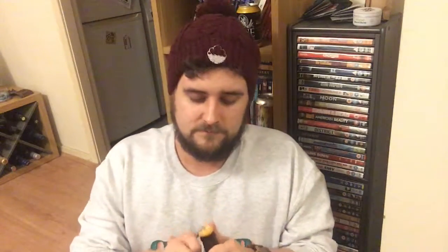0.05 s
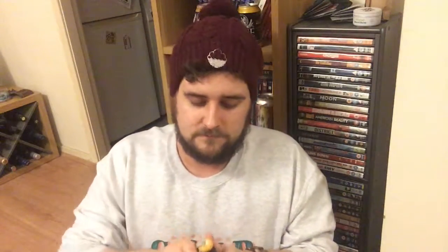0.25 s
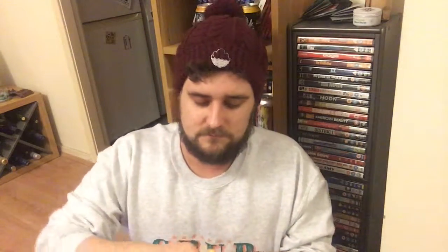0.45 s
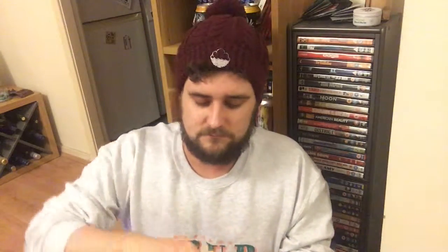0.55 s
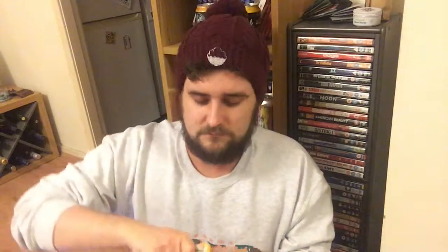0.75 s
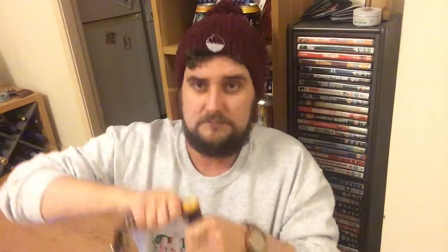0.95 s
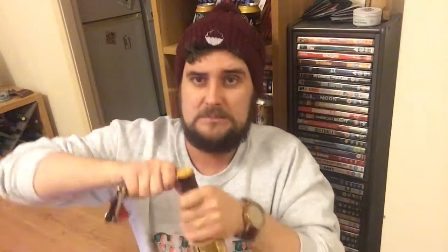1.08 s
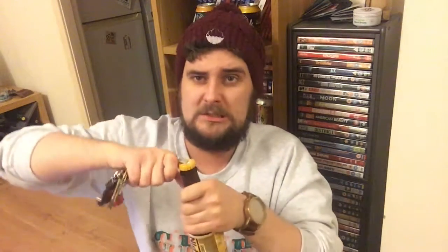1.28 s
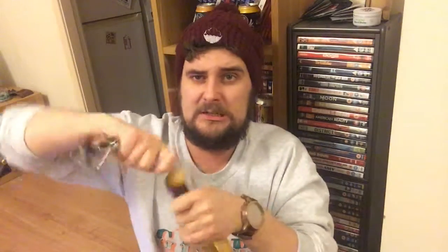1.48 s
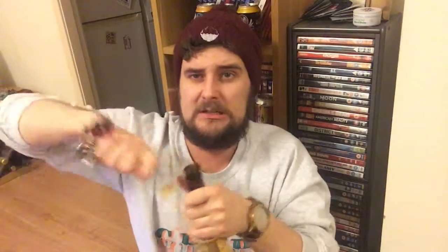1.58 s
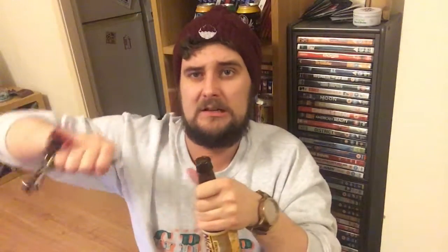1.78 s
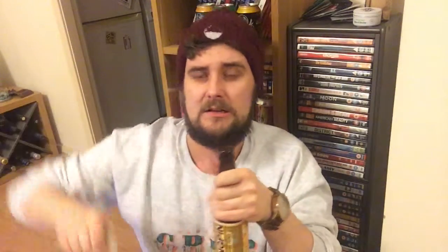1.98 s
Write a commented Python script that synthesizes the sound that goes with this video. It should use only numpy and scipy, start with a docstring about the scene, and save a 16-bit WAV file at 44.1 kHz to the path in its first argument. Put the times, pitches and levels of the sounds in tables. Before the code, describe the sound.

A crown cap is levered off a glass bottle with faint clicks and a sharp pop.

```python
"""Hands bump a glass bottle and a key-ring opener scrapes and clicks onto its crown cap, close to
the microphone in a small room. A little gas hisses past the seal and the crimp gives in dry snaps.
At 1.5 s the cap lifts with a short pop of the bottle neck: gas rushes out, cap and opener ring, and
the keys swing and clash. Mains hum and faint room noise lie underneath."""
import sys
import numpy as np
from scipy import signal
from scipy.fft import rfft, irfft
from scipy.io import wavfile
from scipy.ndimage import uniform_filter1d

SR = 44100
rng = np.random.default_rng(int(sys.argv[2]) if len(sys.argv) > 2 else 0)


def dump(signal):
    """Clip the signal to [-1, 1] and save it as 16-bit WAV at the path in sys.argv[1]."""
    limited = np.clip(np.atleast_2d(signal).T, -1, 1)
    pcm = np.round(limited * 32767).astype(np.int16)
    wavfile.write(sys.argv[1], SR, pcm)


N = 89478


def amp(db):
    """Decibels to gain."""
    return 10 ** (np.asarray(db) / 20)


def unit(x):
    """Scales to rms 1."""
    return x / np.sqrt(np.mean(x ** 2) + 1e-20)


def decay(t, t60):
    """An exponential fall of 60 dB every t60 seconds."""
    return np.exp(-np.log(1000) * t / t60)


def read(points, hz):
    """Reads a table on a log-frequency axis."""
    f, value = np.transpose(points)
    return np.interp(np.log(hz + 1), np.log(f + 1), value)


def add(mix, s, sound):
    """Mixes a sound in at s seconds."""
    part = mix[max(round(s * SR), 0):][:len(sound)]
    part += sound[:len(part)]


def colour(x, spectrum):
    """Gives x a spectrum, at rms 1."""
    return unit(irfft(rfft(x) * amp(read(spectrum, np.fft.rfftfreq(N, 1 / SR))), N))


def crack(band_dbs, t60):
    """A noise burst in six bands; t60 holds at 3 kHz, and the treble dies slightly sooner."""
    # Edges of the six bands: (frequency [Hz])
    edges = [180, 820, 1500, 3300, 5300, 8400, 16000]
    treble_damping, attack_s = 0.032, .0004
    t = np.arange(SR // 16) / SR
    out = np.zeros(len(t))
    for lo, hi, db in zip(edges, edges[1:], band_dbs):
        band_t60 = t60 * (3000 / np.sqrt(lo * hi)) ** treble_damping
        burst = rng.standard_normal(len(t)) * decay(t, band_t60) * (1 - np.exp(-t / attack_s))
        band = signal.sosfilt(signal.butter(2, [lo, hi], "band", fs=SR, output="sos"), burst)
        out += amp(db) * band / np.sqrt(np.sum(band ** 2) / (.005 * SR))  # level: energy over 5 ms
    return out


def ring(hz, db, t60, attack_s=0.00095):
    """One dying mode."""
    t = np.arange(SR // 2) / SR
    return amp(db) * decay(t, t60) * (1 - np.exp(-t / attack_s)) * np.sin(2 * np.pi * hz * t)


def contacts(rows, t60):
    """A series of hard contacts, each a crack of noise."""
    out = np.zeros(N)
    for s, *band_dbs in rows:
        add(out, s, crack(band_dbs, t60))
    return out


def rings(rows, attack_s):
    """A series of knocks, each ringing a single mode."""
    out = np.zeros(N)
    for s, hz, db, t60 in rows:
        add(out, s, ring(hz, db, t60, attack_s))
    return out


def struck(blows, modes):
    """Every blow rings all the given modes."""
    out = np.zeros(N)
    for s, blow_db in blows:
        add(out, s, sum(ring(hz, blow_db + db, t60) for hz, db, t60 in modes))
    return out


def room_tone():
    """The place itself: faint low noise and mains hum."""
    # Room noise: (frequency [Hz], relative level [dB])
    spectrum = [(20, 1), (33, -0.5), (45, 6), (75, 3), (130, -5), (250, -6.5), (500, -11), (1000, -16.5),
                (3500, -20), (8000, -29.5), (16000, -33)]
    hum_hz, hum_db, noise_db = 99.6, -66, -72.5
    hum = amp(hum_db) * np.sin(2 * np.pi * (hum_hz * np.arange(N) / SR + rng.random()))
    return hum + amp(noise_db) * colour(rng.standard_normal(N), spectrum)


def room(x):
    """Dense reflections off the nearby walls, each band dying at its own speed."""
    # Reverberation of the small room: (frequency [Hz], t60 [s])
    decay_times = [(150, 0.42), (1000, 0.33), (3000, 0.36), (6000, 0.33), (10000, 0.25), (16000, 0.23)]
    taps = rng.choice([-1., 1.], SR) * (rng.random(SR) < 1 / 8)
    hz, t, bands = signal.stft(taps, SR, nperseg=256)
    tail = signal.istft(bands * decay(t, read(decay_times, hz)[:, None]), SR, nperseg=256)[1]
    out = np.zeros(N)
    add(out, .004, signal.fftconvolve(x, tail / np.linalg.norm(tail)))  # 4 ms behind the direct sound
    return out


def hands():
    """Opener, keys and glass tick as they are handled, and the hands bump the bottle."""
    # Light contacts: (time [s], level in each of the six bands [dB])
    ticks = [(.019, -60.5, -88, -56, -72, -72, -53), (.055, -62.5, -74, -45.5, -52.5, -64, -85),
             (.219, -78, -89, -56, -49.5, -53.5, -68), (.409, -86, -98, -76, -61, -61.5, -66.5),
             (.431, -84, -93, -70, -60.5, -63, -65), (.752, -77, -82, -64.5, -68, -68, -82),
             (1.088, -69, -66.5, -65.5, -100, -95, -99), (1.099, -69.5, -79, -65.5, -97, -92, -99),
             (1.15, -90, -92, -69.5, -69.5, -94, -87), (1.407, -76, -84, -67.5, -68, -69.5, -77),
             (1.438, -83, -85, -78, -66, -72, -83), (1.9335, -57, -63, -71, -86, -84, -95),
             (1.952, -57, -69, -58, -61, -67, -66.5)]
    # Soft bumps: (time [s], pitch [Hz], level [dB], t60 [s])
    bumps = [(.008, 276.7, -52, 0.14), (.05, 316, -48, 0.055), (1.088, 230, -46.5, 0.035),
             (1.099, 68, -57, 0.14), (1.952, 130, -56, 0.12), (1.96, 63, -61, 0.19)]
    return contacts(ticks, t60=0.013) + rings(bumps, attack_s=0.0064)


def key_rattle():
    """Many tiny contacts among the keys, bunched in clumps and following the movement of the hand."""
    # Stirring of the key bunch: (time [s], level [dB])
    levels = [(0, -59), (0.051, -57), (.12, -88), (.3, -73), (.39, -74), (.425, -69.5), (.48, -74),
              (.55, -80.5), (.79, -80), (1, -85.5), (1.3, -83.5), (1.42, -74), (1.5, -71), (1.62, -58),
              (1.73, -61.5), (1.78, -66), (1.909, -70.5), (2.03, -78.5)]
    # Keys rubbing together: (frequency [Hz], relative level [dB])
    spectrum = [(200, -4.5), (700, -2.5), (1500, 3.5), (2800, 1.5), (4100, 3.5), (6500, -1), (9000, -12.5),
                (16000, -13.5)]
    contacts_per_s, spread_db, clump_db = 6000, 2.5, 3.5
    sizes = amp(spread_db * np.minimum(rng.exponential(1, N), 4))
    grains = sizes * rng.choice([-1, 1], N) * (rng.random(N) < contacts_per_s / SR)
    clumps = amp(clump_db * unit(uniform_filter1d(rng.standard_normal(N), size=256)))
    movement = amp(np.interp(np.arange(N) / SR, *np.transpose(levels)))
    return colour(grains * clumps, spectrum) * movement


def opener_scrape():
    """The opener bites, then slides into place: metal-on-metal friction noise in a few resonances."""
    # Resonances of the scrape: (frequency [Hz], width [Hz], relative level [dB])
    modes = [(2250, 180, -5), (2952, 126, -2.5), (2730, 240, -3), (6400, 140, -18)]
    start_s, length_s, slide_db, bite_gain, bite_s = .055, 0.043, -48, 3, 0.0028
    t = np.arange(0, length_s, 1 / SR)
    friction, sound = rng.standard_normal(SR // 4), np.zeros(len(t))
    for hz, width, db in modes:
        b, a = signal.iirpeak(hz, hz / width, fs=SR)
        resonance = signal.lfilter(b, a, signal.lfilter(b, a, friction))
        sound += amp(db) * unit(resonance[-len(t):])
    bite = 1 + bite_gain * np.exp(-t / bite_s)
    out = np.zeros(N)
    add(out, start_s, amp(slide_db) * unit(sound) * signal.windows.tukey(len(t), .1) * bite)
    return out


def opener_seat():
    """The opener drops onto the cap: a bright click, and the metal rings on."""
    # The landing: (time [s], level [dB])
    blows = [(0.1081, -46)]
    # Opener against cap: (frequency [Hz], relative level [dB], t60 [s])
    modes = [(1106, -7, 0.13), (2370, 0.5, 0.061), (2850, -10.5, 0.12), (5190, -12.5, .15),
             (7219, 1, 0.052), (7860, -4, 0.13), (7950, -9, 0.099)]
    # Contact noise: (frequency [Hz], relative level [dB])
    spectrum = [(200, -24), (800, -17.5), (1300, -3.5), (2300, 3), (4200, -9.5), (6000, 1), (8000, 0),
                (9300, -10.5), (10200, -33), (11500, -2), (14000, -2), (16000, -12)]
    t = np.arange(SR // 16) / SR
    click = amp(-33.5) * colour(rng.standard_normal(N), spectrum)[:len(t)] * decay(t, t60=0.026)
    out = struck(blows, modes)
    add(out, blows[0][0], click)
    return out


def crimp_snaps():
    """The crimp gives way under the lever in short dry snaps."""
    # Snaps: (time [s], level in each of the six bands [dB])
    snaps = [(1.2212, -85, -71.5, -64, -59, -77, -79), (1.2229, -90, -88, -60.5, -61.5, -81, -84),
             (1.2735, -84, -89, -63.5, -62, -67, -83), (1.277, -84, -80, -65.5, -61.5, -66, -84)]
    return contacts(snaps, t60=0.0049)


def metal_clashes():
    """Cap, opener and keys clash after the pop; single pieces clink before and after it."""
    # Collisions: (time [s], level in each of the six bands [dB])
    clashes = [(1.523, -67.5, -57, -57, -51, -73, -55), (1.537, -65.5, -55, -54, -57, -68, -56),
               (1.545, -76, -57, -55, -57, -52, -48), (1.5763, -89, -53.5, -45.5, -50, -47, -66),
               (1.581, -74, -51, -42, -37, -47, -44), (1.589, -75, -51.5, -42.5, -39.5, -38, -40.5),
               (1.5935, -61, -51.5, -43.5, -52, -36, -40.5), (1.5978, -84, -54.5, -68, -52, -45, -40),
               (1.6032, -87, -58, -50, -53, -52, -43), (1.6195, -91, -54, -45.5, -40.5, -54, -54),
               (1.6225, -74, -52.5, -48, -46, -52, -44.5), (1.677, -80, -71, -50, -48, -52, -44),
               (1.6802, -66, -61, -62, -60, -62, -53), (1.707, -70, -79, -50.5, -51, -60, -69),
               (1.715, -71, -71, -77, -66, -53, -53.5), (1.836, -75, -68, -63.5, -59, -68, -75)]
    # Single pieces ringing: (time [s], pitch [Hz], level [dB], t60 [s])
    clinks = [(.056, 2336, -32, 0.028), (.056, 2860, -37.5, 0.038), (.056, 6780, -45.5, 0.031),
              (.219, 5000, -54, 0.015), (.572, 3940, -62.5, 0.06), (.605, 1640, -59.5, 0.04),
              (.752, 1594, -52, 0.024), (.876, 1590, -59, 0.017), (1.2012, 5460, -45.5, 0.0059),
              (1.2222, 4420, -41.5, 0.015), (1.277, 6970, -58.5, 0.028), (1.407, 3900, -47, 0.014),
              (1.487, 4050, -49, 0.017), (1.537, 3830, -38, 0.026), (1.547, 8580, -39.5, 0.033),
              (1.5765, 2980, -37.5, 0.07), (1.589, 9300, -24, 0.01), (1.5935, 7286, -24.5, 0.012),
              (1.604, 9430, -29.5, 0.014), (1.611, 2784, -33, 0.018), (1.6195, 2670, -25, 0.0088),
              (1.670, 3934, -38, 0.034)]
    return contacts(clashes, t60=.018) + rings(clinks, attack_s=0.00048)


def opener_ring():
    """Each blow rings the opener at a slightly different pitch as its grip on the cap shifts."""
    # Blows on the opener: (time [s], level [dB], pitch ratio)
    blows = [(1.552, -30, 1.01), (1.5606, -37.5, 1.025), (1.58, -25.5, .985)]
    # The opener's modes: (frequency [Hz], relative level [dB], t60 [s])
    modes = [(6420, 7, 0.016), (6680, 3.5, 0.025), (5740, 1.5, 0.013), (8670, -13, 0.062),
             (10200, -20, 0.028)]
    out = np.zeros(N)
    for s, blow_db, ratio in blows:
        out += struck([(s, blow_db)], [(hz * ratio, db, t60) for hz, db, t60 in modes])
    return out


def cap_ring():
    """The freed cap is struck once and rings."""
    # Blow on the cap: (time [s], level [dB])
    blows = [(1.5925, -41.5)]
    # The cap's modes: (frequency [Hz], relative level [dB], t60 [s])
    modes = [(1060, 1, 0.17), (1316, 5, 0.053), (1660, -13, 0.039), (2753, -14, .26), (3910, -1.5, 0.23),
             (4899, -28, 0.19), (5560, -8, 0.12), (6605, -18, 0.094)]
    return struck(blows, modes)


def jet(spectrum, start_s, rise_s, hold_s, t60, db):
    """A smooth jet of gas swells, holds and dies away."""
    t = np.arange(N) / SR - start_s
    swell = np.sin(np.pi / 2 * np.clip(t / rise_s, 0, 1)) ** 2
    fade = decay(np.maximum(t - rise_s - hold_s, 0), t60)
    return amp(db) * swell * fade * colour(rng.standard_normal(N), spectrum)


def gas():
    """A first leak past the seal, the rush when the cap lifts, and a last burst as it comes free."""
    # Gas slipping past the seal: (frequency [Hz], relative level [dB])
    leak = [(200, -25.5), (900, -21), (1500, -13.5), (2600, -10.5), (4000, -4), (5000, -7.5), (8300, 1),
            (12000, -2.5), (13500, -6.5), (16000, -5.5)]
    # Gas leaving under the lifted cap: (frequency [Hz], relative level [dB])
    rush = [(200, -26), (700, -21), (1300, -20), (3000, 10.5), (4200, 8.5), (6500, 3), (9500, 6.5),
            (12000, -6), (16000, 5)]
    return (jet(leak, start_s=0.5995, rise_s=0.045, hold_s=0.024, t60=0.072, db=-44.5)
            + jet(rush, start_s=1.515, rise_s=0.041, hold_s=0.014, t60=0.65, db=-49)
            + jet(rush, start_s=1.584, rise_s=0.0043, hold_s=0.011, t60=0.095, db=-40))


def pop():
    """The seal lets go: a puff and a short pop of the bottle neck, with a longer ring near 1.2 kHz."""
    # The release: (time [s], level [dB])
    release = [(1.5131, -38.5)]
    # The pop and its longer ring, probably the room: (frequency [Hz], relative level [dB], t60 [s])
    modes = [(927, 5.5, 0.015), (1009, -0.5, 0.026), (1227, -5, 0.11), (1960, 5.5, 0.0069),
             (2930, -7.5, 0.074), (3530, -10, 0.029)]
    # The puff: (level in each of the six bands [dB])
    puff = (-63.5, -51, -51.5, -64, -63, -63)
    out = struck(release, modes)
    add(out, release[0][0], crack(puff, t60=0.021))
    return out


def scene():
    """At the microphone: each source direct, its share of the reflections, and the room tone."""
    handling = hands() + key_rattle()
    opening = pop() + metal_clashes() + opener_ring() + cap_ring()
    # (sound, level sent to the room [dB])
    sources = [(handling, -3.5), (opening, -6.5), (gas(), -8),
               (opener_scrape(), -12), (opener_seat(), -4.5), (crimp_snaps(), -9)]
    direct = sum(sound for sound, _ in sources)
    reflections = room(sum(amp(db) * sound for sound, db in sources))
    return (direct + reflections + room_tone())[None]


def record(dry):
    """One microphone, rolling off below 36 Hz and band-limited at 15.9 kHz."""
    thin = signal.sosfilt(signal.butter(4, 36, "high", fs=SR, output="sos"), dry)
    band_limit = signal.firwin(511, 15900, window=("kaiser", 8), fs=SR)
    return signal.oaconvolve(thin, band_limit[None], "same")


dry = scene()
out = record(dry)
dump(out)
```